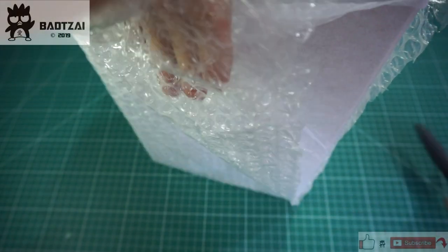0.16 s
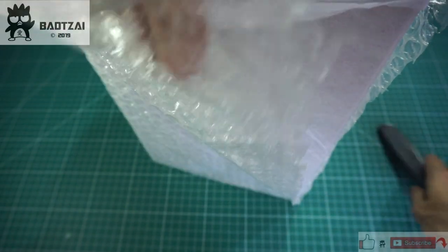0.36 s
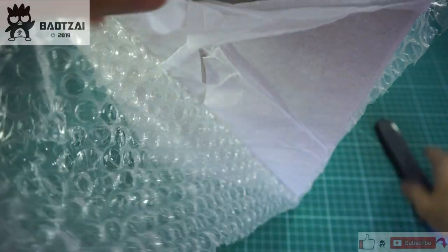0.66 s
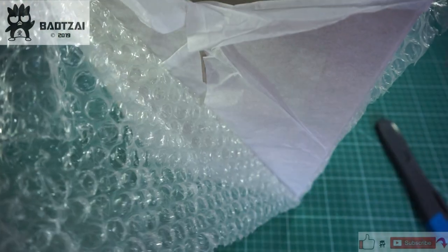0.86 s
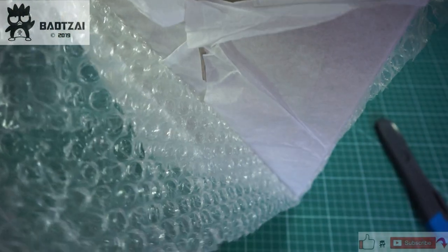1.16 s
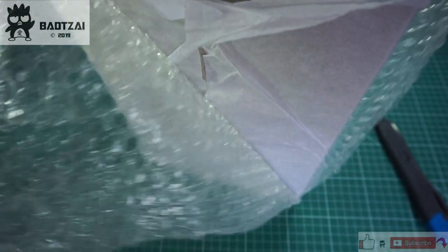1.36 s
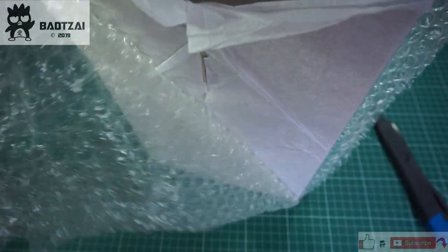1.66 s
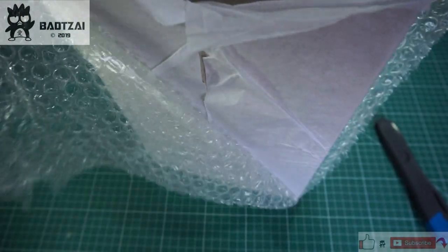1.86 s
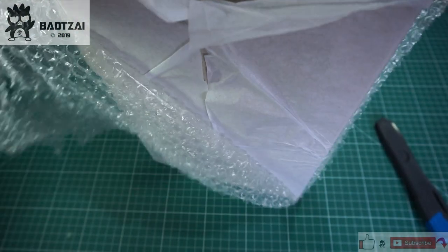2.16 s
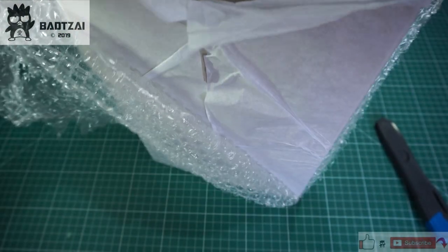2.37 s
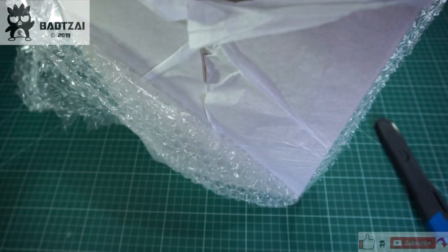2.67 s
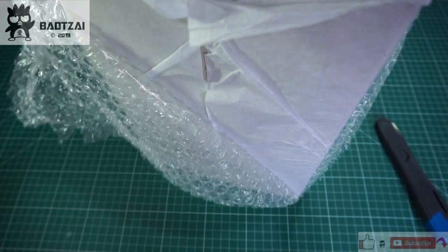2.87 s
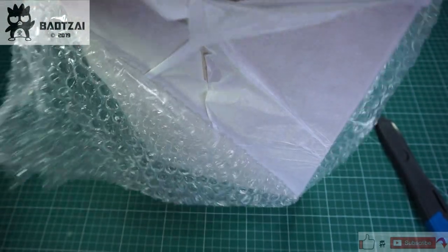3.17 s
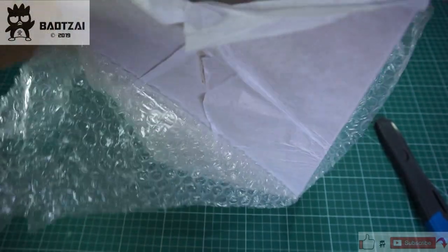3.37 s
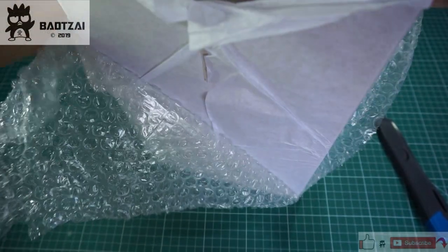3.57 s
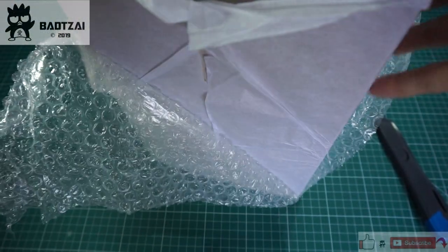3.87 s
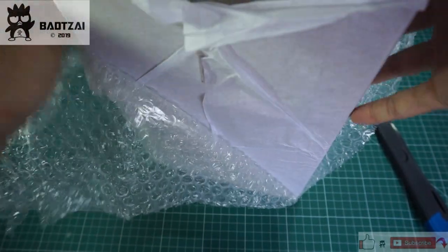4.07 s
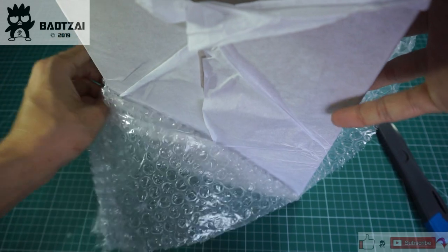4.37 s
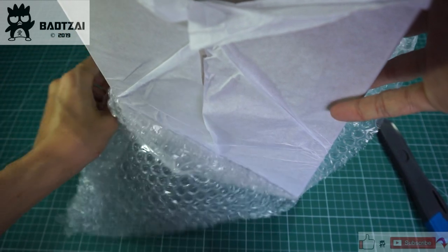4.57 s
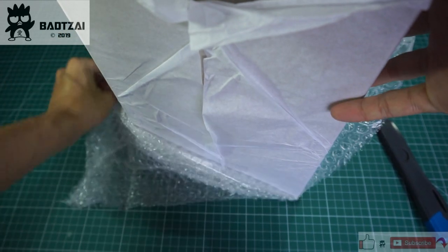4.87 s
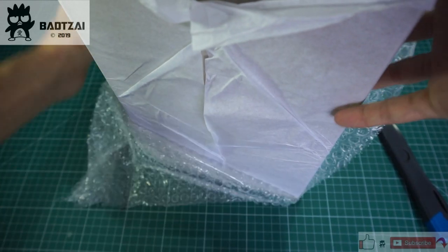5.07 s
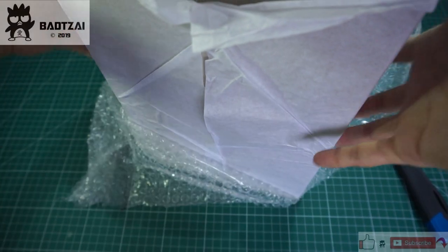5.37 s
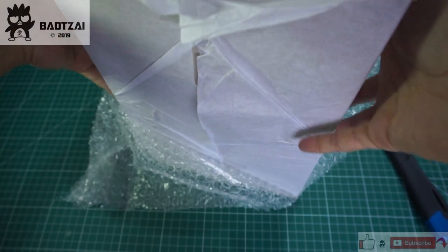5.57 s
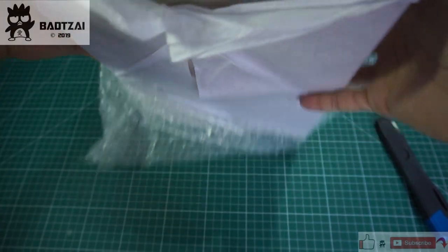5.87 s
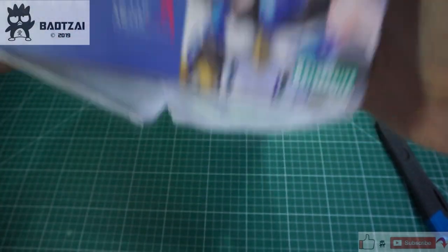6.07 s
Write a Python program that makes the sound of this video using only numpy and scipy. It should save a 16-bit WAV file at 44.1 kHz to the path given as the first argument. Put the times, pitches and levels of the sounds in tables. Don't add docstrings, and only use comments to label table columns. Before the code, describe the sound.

In a small room, heard very close in stereo, the sound opens with a few sharp film snaps and a peeling rasp until about 0.2 s, then lighter crinkling. A plastic knife is laid on a mat: taps at 0.37 and 0.54, the loudest at 0.66, each short and hard with a slight rattle. From 0.8 to 1.1 only sparse ticks and a small rustle remain over a faint, steady fan hum. A soft low push at 1.14 leads into bright, dense bubble wrap crackling, jerky and full of snaps and occasional deeper pops, until about 3.5. It drops almost to silence around 3.7-4.0, with lone ticks. A second surge, smoother and thicker, runs 4.1-5.0, with a faint hollow drag beneath. At 5.3 a cardboard box bumps with tiny rebounds, then scrapes until 5.55. Softer crinkles and thin hisses continue in small swells to the end, just past 6.2.

```python
import sys
import numpy as np
from scipy import signal
from scipy.fft import rfft, irfft, next_fast_len
from scipy.io import wavfile

SR = 44100
rng = np.random.default_rng(int(sys.argv[2]) if len(sys.argv) > 2 else 0)


def dump(signal):
    limited = np.clip(np.atleast_2d(signal).T, -1, 1)
    pcm = np.round(limited * 32767).astype(np.int16)
    wavfile.write(sys.argv[1], SR, pcm)


def magnitude_from_level(level_db):
    exponent = np.asarray(level_db, float) / 20
    return 10 ** exponent


N = 274743

# start in seconds, peak level in dB, softness of the blow in Hz.
TAPS = [
    (.3737, -7, 4000),
    (.386, -15, 4000),
    (.5395, -11.5, 2500),
    (.555, -20, 2500),
    (.598, -24, 3500),
    (.6562, -.5, 4500),
]


def rms_one(x):
    return x / np.sqrt(np.mean(x ** 2) + 1e-20)


def in_time(rows):
    s, *columns = np.transpose(rows)
    return [np.interp(np.arange(N) / SR, s, c) for c in columns]


def at_hz(points, hz):
    return np.interp(np.log(hz), np.log(np.array(points)[:, 0]), np.array(points)[:, 1])


def band(x, low_hz, high_hz, order=2):
    return signal.sosfilt(signal.butter(order, [low_hz, high_hz], "band", fs=SR, output="sos"), x)


def drift(rate_hz):
    r = np.exp(-2 * np.pi * rate_hz / SR)
    settle = 9000
    return rms_one(signal.lfilter([1], [1, -2 * r, r * r], rng.standard_normal(N + settle))[settle:])


def ring(clicks, hz, t60):
    r, w = magnitude_from_level(-60 / (t60 * SR)), 2 * np.pi * hz / SR
    return signal.lfilter([0, np.sin(w)], [1, -2 * r * np.cos(w), r * r], clicks + 1e-18)


def ports(x, lag_us):
    size = next_fast_len(N)
    turn = np.exp(-1j * np.pi * np.arange(size // 2 + 1) * SR / size * lag_us * 1e-6)
    return irfft(rfft(x, size) * np.array([turn, turn.conj()]), size)[:, :N]


def handling():
    # time in seconds, effort in dB, slackness in dB, left-right balance in dB.
    hands = [(0, -31, -31, -3), (.19, -38, 1.5, 1), (.75, -39, -2, 1.5), (.86, -72.5, -14, -1),
             (1.11, -53.5, -2.5, 10.5), (1.135, -38, -19, 0), (1.23, -22, -5, -0.5), (1.7, -26.5, 2.5, 0),
             (2.6, -26, -3.5, 1.5), (3.3, -24.5, 3.5, 0), (3.62, -33, 1.5, 0.5), (3.76, -62, -6, 1.5),
             (4.03, -51, 1, 2.5), (4.17, -24.5, -0.5, 1.5), (4.88, -24.5, 2.5, 2), (5.16, -52.5, 3.5, 1.5),
             (5.42, -35, 1, 1.5), (6.23, -40, 4, 1)]
    # centre in seconds, effort in dB, reach in seconds,
    # slackness in dB.
    tugs = [(.1, 3.5, 0.091, 4), (.305, 5, 0.022, -2), (.4, 4.5, 0.025, 9), (.49, 2.5, 0.069, 2),
            (0.552, 3, 0.04, 3), (.71, 8, 0.043, 2), (.96, 20.5, 0.073, 11), (1.385, 1.5, 0.042, 2.5),
            (1.465, -6, 0.063, 0), (1.63, -5, 0.037, -2.5), (1.832, -9, 0.035, -5), (1.89, 2, 0.2, -1),
            (2.125, -3, 0.09, 1.5), (2.46, -6.5, 0.11, 2), (2.72, -2.5, 0.04, -3), (2.849, 2.5, 0.065, 1.5),
            (2.95, -4, 0.18, 0), (3.201, 1.5, 0.055, 3.5), (4.5, 0, 0.073, 2), (4.944, -4, 0.094, -2),
            (5.001, 7.5, 0.076, 0), (5.245, -3, 0.092, 1), (5.322, 2.5, 0.036, 11.5),
            (5.518, 9, 0.087, 0.5), (5.715, 4, 0.044, 1.5), (5.8, -2, 0.094, -3), (6.11, 9, 0.08, -12),
            (1.055, 6.5, 0.045, 3), (1.159, -1, 0.024, 8), (1.52, 4, 0.022, 4.5),
               (1.56, 0.5, 0.011, 6.5), (2.154, 3.5, 0.014, 5.5), (1.3, 1, 0.056, 1.5),
               (3.43, 4.5, 0.061, -1), (4.6, 0.5, 0.091, -0.5), (5.385, 7, 0.038, -11), (5.46, 2, 0.037, 5),
               (5.59, -1.5, 0.039, -8), (5.64, 5, 0.055, -3.5), (5.93, 2, 0.16, -7), (6.169, 1, 0.054, 1.5)]
    # start in seconds, end in seconds, effort in dB, slackness in dB.
    jerks = [
        (1.134, 1.169, 8.5, 6),
        (1.27, 1.284, -7, -1),
        (1.361, 1.42, 1.5, 1.5),
        (2.18, 2.218, -8.5, 2),
        (2.302, 2.37, 4, 1),
        (2.401, 2.41, 8, 5.5),
        (2.565, 2.642, 3, -0.5),
        (4.044, 4.109, 10, 2),
        (5.444, 5.543, 3, 0.5),
        (6.082, 6.143, 1, -2),
    ]
    usual_effort_db, jerk_edge_s = -26, .004
    t = np.arange(0, N + 32, 32) / SR
    s, *columns = np.transpose(hands)
    effort_db, slack_db, pan_db = [np.interp(t, s, c) for c in columns]
    shapes = []
    for s, db, reach_s, give_db in tugs:
        bump = np.cos(.5 * np.pi * np.clip((t - s) / reach_s, -1, 1)) ** 2
        shapes.append((bump, db, give_db))
    for start, end, db, give_db in jerks:
        step = np.clip(np.minimum(t - start, end - t) / jerk_edge_s + .5, 0, 1)
        shapes.append((step, db, give_db))
    for shape, db, give_db in shapes:
        effort_db = effort_db + db * shape
        slack_db = slack_db + give_db * shape
    return [np.interp(np.arange(N) / SR, t, c) for c in (effort_db - usual_effort_db, slack_db, pan_db)]


def crackle():
    zone_edges = [450, 1200, 3200, 7500, 11500, 15800]
    # level in dB, share of the effort followed, share of the slackness followed.
    zones = [
        (-49, 0.62, 1.92),
        (-36.5, 0.81, 0.79),
        (-31, 0.89, 0.38),
        (-26, 0.88, 0.16),
        (-25, 0.96, -0.22),
    ]
    # frequency in Hz, density in dB per Hz.
    film_spectrum = [(400, -66), (700, -8), (1200, -35.5), (2200, -5.5), (5500, 6), (7800, 5.5),
                     (11000, 7.5), (15800, -32.5)]
    # left lag in microseconds, side from -1 to 1.
    sides = [(-40, 1.0), (-22, .6), (22, -.6), (40, -1.0)]
    # rate per second, low edge in Hz, high edge in Hz, level in dB.
    ticks_per_s, ticks_low_hz, ticks_high_hz, ticks_db = (40, 2500, 14000, -48)
    quiet_per_s, spread_db, clump_db, cycles = 1100, 3.2, 1.2, 4.0

    effort_db, slack_db, pan_db = handling()
    zone_db = [db + works * effort_db + sags * slack_db for db, works, sags in zones]
    tearing = np.arange(N) < 3.15 * SR
    per_s = np.where(tearing, 1, 2.0) * quiet_per_s * magnitude_from_level(.4 * (effort_db + 18.5))
    clumps = magnitude_from_level(clump_db * np.where(tearing, 1, .5) * (drift(23.0) + 1.7 * drift(89)))
    out = np.zeros((2, N))
    for lag_us, side in sides:
        sizes = magnitude_from_level(spread_db * np.minimum(rng.exponential(1, N), 5)) * rng.choice([-1, 1], N)
        grains = sizes * (rng.random(N) < per_s / SR) * clumps / np.sqrt(per_s)
        dealt = rng.integers(0, 4, N)
        patch = 0
        for low, high, level_db in zip(zone_edges, zone_edges[1:], zone_db):
            pitches = low * (high / low) ** ((np.arange(4) + rng.random(4)) / 4)
            zone = 0
            for k, hz in enumerate(pitches):
                rings = rms_one(ring(grains * (dealt == k), hz, cycles / hz))
                zone = zone + magnitude_from_level(at_hz(film_spectrum, hz)) * np.sqrt(hz) * rings
            patch = patch + magnitude_from_level(level_db - 7.0) * rms_one(band(zone, .85 * low, 1.15 * high))
        stray = grains / sizes * (rng.random(N) < ticks_per_s / per_s) * rng.normal(0, 1, N)
        ticks = band(stray, ticks_low_hz, ticks_high_hz, order=1)
        patch = patch + magnitude_from_level(ticks_db + effort_db) * rms_one(ticks * np.sqrt(per_s))
        out += magnitude_from_level(.5 * side * pan_db) * ports(patch, lag_us)
    return out * magnitude_from_level(1.4 * pan_db * np.array([[1], [-1]]))


def snaps(rows, cycles, gain_db, crack):
    out, t = np.zeros((2, N + 200)), np.arange(200) / SR
    for (s, peak_db, hz, pan_db), (lag, below, thin) in zip(rows, rng.random((len(rows), 3))):
        late = np.maximum(t - np.array([[1], [0]]) * (1.5 + 3 * lag) * 1e-5 - 1.1e-3, 0)
        wave = 0
        for share, f in ((1, hz), (.3, hz * (.45 + .3 * below)), (crack, 5000 + 8000 * thin)):
            swell = late * f / cycles * np.exp(1 - late * f / cycles)
            wave = wave + share * swell * np.sin(2 * np.pi * f * late)
        soft_db = crack * 14 * np.log10(min(hz / 9000, 1))
        side_db = np.clip(pan_db, -8, 8) * np.array([[.5], [-.5]])
        at = round(s * SR)
        out[:, at:at + 200] += magnitude_from_level(peak_db + gain_db + soft_db + side_db) * wave
    return out[:, :N]


def loud_snaps():
    # start in seconds,
    # peak level in dB, pitch in Hz, left-right balance in dB.
    single = [(0.0036, -5, 4700, -5), (0.0282, -5, 12700, -8), (0.0584, -6, 12900, -6),
              (0.203, -20, 8400, 1), (0.2157, -18, 8500, 0), (0.2975, -20, 5400, -1),
              (0.3141, -18, 9800, -3), (0.3725, -11, 3000, -10), (0.3804, -16, 10400, 1),
              (0.3847, -17, 3300, 1), (0.4865, -21, 7100, 5), (0.5228, -19, 8800, 10),
              (0.5388, -15, 3300, -7), (0.6285, -19, 8500, 6)]
    # start in seconds, peak in dB, pitch in Hz, balance in dB.
    tearing = [(1.1276, -16, 4000, 9), (1.1353, -12, 12900, 4), (1.2602, -7, 10500, -4),
               (1.2638, -4, 13400, -5), (1.2677, -7, 13300, -3), (1.2818, -6, 11200, -4),
               (1.2899, -4, 10700, -3), (1.3127, -6, 10900, -4), (1.3387, -7, 3400, -4),
               (1.3707, -7, 11500, 2), (1.379, -6, 11500, -3), (1.4108, -8, 14500, -4),
               (1.4263, -3, 12400, -3), (1.4371, -7, 3500, -1), (1.4571, -9, 3200, 10),
               (1.4718, -14, 8700, 4), (1.5192, -6, 9500, -2), (1.5574, -8, 13600, -3),
               (1.5759, -7, 14000, -1), (1.6344, -9, 10700, -4), (1.6683, -10, 12800, -5),
               (1.6772, -11, 12700, -3), (1.7092, -12, 14400, 7), (1.7216, -7, 10600, 8),
               (1.7616, -8, 6500, -6), (1.7807, -9, 13600, 9), (1.8208, -3, 10900, 9),
               (1.8436, -9, 9600, 9), (1.8918, -8, 13900, -3), (1.9394, -7, 12800, 6),
               (1.9623, -4, 13700, -2), (1.9858, -7, 9500, -4), (2.0036, -7, 12500, 6),
               (2.0144, -5, 10900, 7), (2.0473, -9, 14100, 6), (2.0578, -11, 11500, 1),
               (2.0851, -8, 13900, 8), (2.1132, -11, 13700, 4), (2.127, -9, 14000, 7),
               (2.1507, -6, 14200, -4), (2.1597, -8, 9600, 9), (2.171, -10, 12200, 3),
               (2.1769, -10, 12700, -2), (2.1807, -5, 11300, -3)]
    tearing_on = [(2.2004, -11, 14000, -3), (2.2226, -7, 14000, 6), (2.2283, -10, 14200, -1),
                  (2.2324, -10, 9400, -2), (2.238, -9, 13800, 6), (2.2878, -11, 13300, 7),
                  (2.2957, -10, 5300, 11), (2.3119, -9, 9500, 6), (2.3654, -7, 13800, -4),
                  (2.4002, -9, 12000, 6), (2.4332, -9, 10800, 8), (2.4941, -11, 8500, 7),
                  (2.5308, -12, 12300, 7), (2.5846, -8, 13600, 0), (2.595, -9, 9000, 5),
                  (2.6329, -7, 11000, 3), (2.6511, -11, 12700, 8), (2.6634, -8, 9600, 3),
                  (2.6821, -9, 2800, 1), (2.6883, -9, 14000, 5), (2.7437, -14, 3400, 6),
                  (2.7671, -11, 9900, 6), (2.777, -11, 10900, 3), (2.8377, -8, 4500, 6),
                  (2.8455, -10, 3600, 7), (2.8638, -11, 5900, 5), (2.8677, -11, 3700, 2),
                  (2.8873, -12, 8100, 7), (3.0115, -13, 10900, 2), (3.0206, -13, 11700, 7),
                  (3.0369, -13, 11700, 5), (3.0675, -11, 6900, 1), (3.0846, -5, 7600, 8),
                  (3.1174, -2, 12900, 7), (3.1258, -9, 9600, 7), (3.2136, -10, 13200, -3),
                  (3.2186, -6, 12900, -7), (3.2745, -5, 2600, 12), (3.3217, -11, 13300, -3),
                  (3.3503, -10, 7700, -5), (3.365, -10, 12500, -5), (3.3937, -8, 11600, 8),
                  (3.4159, -8, 8900, -6), (3.5491, -16, 11700, -4)]
    # start in seconds,
    # peak in dB, pitch in Hz, balance in dB.
    catches = [(4.0945, -16, 12100, 6), (4.1569, -12, 7700, 11), (4.1707, -10, 7400, 7),
               (4.1978, -10, 8800, 7), (4.2083, -7, 12300, 8), (4.2119, -11, 12700, 9),
               (4.2371, -8, 11100, 8), (4.2453, -6, 11900, 6), (4.2516, -9, 9700, 5),
               (4.2596, -4, 14000, 3), (4.3055, -9, 11700, 7), (4.37, -10, 14200, 6),
               (4.4209, -9, 14000, 5), (4.4245, -5, 9500, 8), (4.4533, -9, 11300, 5), (4.4687, -7, 3900, 7),
               (4.5664, -7, 10600, 4), (4.5718, -10, 14000, 9), (4.5869, -7, 13000, 8),
               (4.6191, -8, 12700, 7), (4.6235, -6, 3100, 4), (4.647, -9, 9500, 8), (4.6623, -9, 14000, 6),
               (4.6675, -9, 11500, 5), (4.7424, -4, 10500, 7), (4.8466, -10, 4200, 7),
               (4.8882, -4, 11500, 9), (4.9861, -16, 7100, 9), (5.1124, -23, 14600, 4),
               (5.173, -15, 11400, -5), (5.1902, -19, 13500, 9), (5.2932, -18, 2500, 8),
               (5.3098, -7, 10100, -6), (5.3369, -17, 11200, -5), (5.4095, -14, 14500, -6),
               (5.4795, -11, 13400, -7), (5.5047, -10, 13600, -4), (5.5531, -11, 4700, 14),
               (5.6192, -15, 9000, 8), (5.6818, -14, 5900, 11), (5.8641, -15, 12100, -4),
               (6.0848, -13, 13900, -4), (6.1294, -11, 11900, -3), (6.1828, -16, 13900, -5)]
    return snaps([*single, *tearing, *tearing_on, *catches], cycles=.9, gain_db=-5.5, crack=.45)


def rub(curve, resonances, per_s, lag_us):
    clicks = rng.standard_normal(N) * (rng.random(N) < per_s / SR) * magnitude_from_level(1.2 * drift(57))
    body = sum(magnitude_from_level(db) * rms_one(band(clicks, low, high)) for low, high, db in resonances)
    return ports(magnitude_from_level(in_time(curve)[0]) * body, lag_us)


def peeling_strip():
    # time in seconds, level in dB.
    peel = [(0, -29.5), (.06, -33), (.12, -32), (.17, -50), (.22, -89), (6.23, -90)]
    # low edge in Hz, high edge in Hz, level in dB.
    strip = [(3000, 5600, 0.5), (11800, 14500, -1.5)]
    return rub(peel, strip, 8300, -37)


def fan():
    # frequency in Hz, density in dB per Hz.
    flow_spectrum = [(22, -48), (60, -14.5), (202, -2), (312, 5), (745, 1.5), (2000, 2), (6360, -5.5),
                     (15800, 0)]
    # frequency in Hz, left-right likeness from -1 to 1.
    likeness = [(60, 1), (300, 0.67), (640, 0.27), (3000, 0.23), (7000, -0.63), (15000, -0.41)]
    # frequency in Hz, width in Hz, level in dB.
    hum_lines = [(311.4, 7.7, -12), (295, 42, -12), (399, 20, -12), (617, 22, -15), (219, 59, -13),
                 (243, 42, -17.5)]
    motor_hz, motor_db = 311.3, -9
    level_db, swing_db, swing_s, facing_s = -38, 3, 2.92, 3.26
    fade_db, fade_s = -23, 0.23

    out, edges = 0, 22 * 2 ** np.arange(0, 9.6, .5)
    white = rng.standard_normal((2, 2, N))
    for k, (low, high) in enumerate(zip(edges, edges[1:])):
        mid, side = band(white[k % 2], low, high)
        hz = np.sqrt(low * high)
        alike = np.clip(at_hz(likeness, hz), -1, 1)
        stereo = np.sqrt(1 + alike) * mid + np.sqrt(1 - alike) * side * np.array([[1], [-1]])
        out = out + magnitude_from_level(at_hz(flow_spectrum, hz)) * stereo
    t = np.arange(N) / SR
    motor = magnitude_from_level(motor_db + 2.5 * drift(4)) * np.sin(2 * np.pi * motor_hz * t + 1.5 * drift(4))
    out = rms_one(out) + motor
    for hz, width_hz, line_db in hum_lines:
        out = out + magnitude_from_level(line_db) * rms_one(ring(rng.standard_normal(N), hz, 2.4 / width_hz))
    swing = swing_db * np.cos(2 * np.pi * (t - facing_s) / swing_s)
    return magnitude_from_level(level_db + swing + fade_db * np.exp(-t / fade_s) - 7.0) * out


def struck(hits, modes, gain_db):
    out = np.zeros(N)
    for (s, peak_db, soft_hz), luck in zip(hits, rng.normal(0, 0.3, (len(hits), len(modes)))):
        at = round(s * SR)
        blow = np.zeros(min(SR // 2, N - at))
        blow[0] = magnitude_from_level(peak_db + gain_db)
        blow = signal.lfilter(*signal.butter(2, soft_hz, fs=SR), blow)
        out[at:at + len(blow)] += sum(magnitude_from_level(db + g) * ring(blow, hz, t60) for (hz, db, t60), g in zip(modes, luck))
    return out


def rattle():
    low_hz, high_hz, under_db, t60 = (1000, 3500, -25, .22)
    t = np.arange(N) / SR
    dying = 0
    for s, db, _ in TAPS:
        swell = np.clip((t - s) / .012, 0, 1)
        dying = dying + swell * magnitude_from_level(db + under_db - 60 * np.maximum(t - s, 0) / t60)
    grains = rng.standard_normal(N) * (rng.random(N) < 9000 / SR)
    return dying * rms_one(band(grains, low_hz, high_hz))


def knife():
    # frequency in Hz, level in dB, t60 in seconds.
    knife_modes = [(590, -33, 0.013), (1230, -22, 0.022), (1560, -25, .018), (1870, -18, 0.016),
                   (2300, -25, .014), (2800, -14.5, 0.014), (3100, -17, 0.006), (4640, -30, 0.0079)]
    taps = band(struck(TAPS, knife_modes, gain_db=4.0), 400, 7000)
    return ports(taps + rattle(), 40) * magnitude_from_level([[-2.5], [2.5]])


def creep_ticks():
    # start in seconds, peak in dB, pitch in Hz,
    # left-right balance in dB.
    creep = [(0.7842, -20, 13900, -3), (0.8014, -27, 14500, 7), (0.8122, -24, 11900, 6),
             (0.8414, -25, 10200, 2), (0.883, -29, 13400, 5), (0.8983, -23, 14700, -2),
             (0.9051, -18, 13900, 7), (0.91, -28, 9600, 7), (0.9242, -28, 9400, -2),
             (0.9564, -25, 13900, 3), (0.9645, -25, 9200, 3), (1.0846, -21, 13400, 6),
             (1.094, -19, 9100, 4), (1.0982, -19, 10900, 7),
             (3.6732, -27, 14600, 7), (3.6776, -26, 2700, 9), (3.7097, -18, 11500, -8),
                   (3.8331, -33, 3000, 4), (3.8706, -29, 8600, 10), (3.9115, -29, 13300, 5),
                   (4.0129, -26, 6500, 7), (4.0459, -27, 14100, 7)]
    return snaps(creep, cycles=.55, gain_db=-1.0, crack=.5)


def taut():
    # centre in seconds, reach in seconds, level in dB, pitch in Hz, left lag in microseconds.
    patches = [
        (1.225, 0.051, -27, 12500, 24),
        (2.33, 0.054, -36, 8500, -30),
        (2.62, .04, -35, 13500, -35),
        (5.75, .04, -47.5, 3530, 30),
        (5.93, 0.069, -41, 7400, -30),
        (6.115, 0.065, -34, 12800, 30),
    ]
    slips = rng.standard_normal(N) * (rng.random(N) < 9000 / SR)
    t = np.arange(N) / SR
    out = np.zeros((2, N))
    for s, reach_s, db, hz, lag_us in patches:
        if lag_us in (-30, 30):
            swell = np.cos(.5 * np.pi * np.clip((t - s) / reach_s, -1, 1))
            hiss = rms_one(band(slips, .85 * hz, 1.15 * hz, order=1))
            out += ports(magnitude_from_level(db) * swell * hiss, lag_us)
    return out


def crease_pops():
    # start in seconds, peak level in dB, pitch in Hz, left-right balance in dB.
    pops = [(1.289, -24.5, 2700, -1.0), (1.377, -12.5, 2830, -5), (1.51, -21, 2800, 5),
            (1.597, -18, 3320, 0), (1.76, -17.5, 2560, -12), (2.151, -30, 1480, -20.5),
            (2.222, -28, 1940, -6), (2.397, -26.5, 2060, 0), (2.619, -17.5, 2430, 7),
            (2.682, -14.5, 1870, 0), (2.842, -24, 2880, -5), (3.208, -24, 1560, -6), (3.273, -11, 2230, 4),
            (4.074, -27, 2120, 2.5), (4.489, -21.5, 2430, -7), (4.622, -13, 3200, 8), (5.191, -31, 1380, 9),
            (5.539, -22, 2550, 2)]
    return snaps(pops, cycles=0.97, gain_db=-0.5, crack=0)


def box():
    # start in seconds, peak level in dB, softness in Hz.
    push = [(1.14, -9, 150)]
    # frequency in Hz, level in dB, t60 in seconds.
    desk_modes = [(93, -27, .12), (190, -27, .08)]
    # time in seconds, level in dB.
    drag = [(4.2, -72), (4.33, -48), (4.55, -41.5), (4.82, -50), (4.95, -73)]
    # low edge in Hz, high edge in Hz, level in dB.
    hollow = [(600, 860, 0)]
    # start in seconds, peak level in dB, softness in Hz.
    bumps = [
        (5.2945, -15, 5000),
        (5.3065, -23.5, 1500),
        (5.32, -26, 1500),
        (5.34, -30, 900),
    ]
    # frequency in Hz, level in dB, t60 in seconds.
    box_modes = [(233, -10, 0.17), (305, -0.5, 0.15), (350, -6, 0.09), (480, -10, .06), (670, -9, 0.066),
                 (760, -9, 0.069), (950, -6, 0.035), (1300, -4, 0.03), (1650, -5, .02), (2010, -3, 0.015),
                 (2800, 0, 0.013)]
    # time in seconds, level in dB.
    slide = [(5.3, -90), (5.36, -52), (5.41, -40.5), (5.47, -38.5), (5.52, -51), (5.6, -93)]
    # low edge in Hz, high edge in Hz, level in dB.
    card = [(230, 340, -1), (600, 900, -1.5), (1200, 1550, 0.5)]
    blows = band(struck(bumps, box_modes, gain_db=-9.5), 180, 7000) + struck(push, desk_modes, gain_db=-9.5)
    return ports(blows, 54) + rub(slide, card, 2000, 12) + rub(drag, hollow, 1500, 12)


def room(x):
    t60, wall_cut_hz = 0.54, 9000
    place_s = .9
    size, t = next_fast_len(N + SR // 2), np.arange(SR // 2) / SR
    decay = magnitude_from_level(-60 * t / t60)
    echoes = rng.standard_normal((3, 2, len(t))) * np.clip((t - .008) / .012, 0, 1) * decay
    dull = signal.lfilter(*signal.butter(1, wall_cut_hz / 2, fs=SR), echoes)
    echoes = dull + (echoes - dull) * decay
    turns = np.arange(N) / SR / place_s - np.arange(3)[:, None] / 3
    places = np.cos(np.pi * turns) * np.sqrt(2 / 3)
    response = rfft(2 * rms_one(echoes) / np.sqrt(len(t)), size)
    tail = (response * rfft(x * places, size)[:, None]).sum(axis=0)
    hz = np.arange(size // 2 + 1) * SR / size
    alike = 1 / (1 + (hz / 700) ** 2)
    return irfft(tail + alike * (tail.mean(axis=0) - tail), size)[:, :N]


def scene():
    film = crackle() + loud_snaps() + taut() + creep_ticks() + crease_pops() + peeling_strip()
    hard = knife() + box()
    tail = room((magnitude_from_level(-14.0) * film + magnitude_from_level(-18.5) * hard).mean(axis=0))
    return film + hard + tail + fan()


def roll_off(x):
    return signal.sosfilt(signal.butter(12, 17070, fs=SR, output="sos"), x)


def record(dry):
    x = signal.sosfilt(signal.butter(3, 130, "high", fs=SR, output="sos"), dry)
    x = 1.3 * np.tanh(x / 1.3)
    x = signal.sosfilt(signal.cheby2(24, 50, 15950, fs=SR, output="sos"), x)
    return roll_off(x)


dry = scene()
out = record(dry)
dump(out)
```